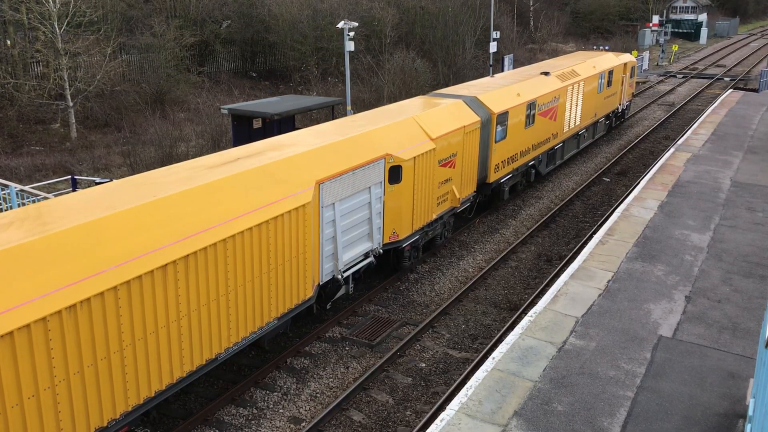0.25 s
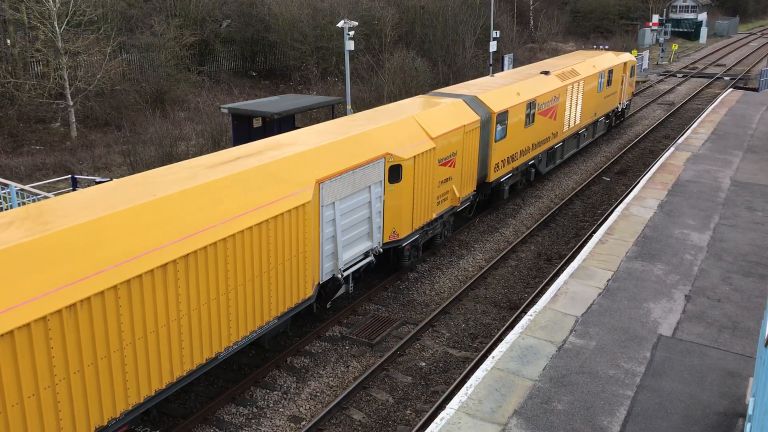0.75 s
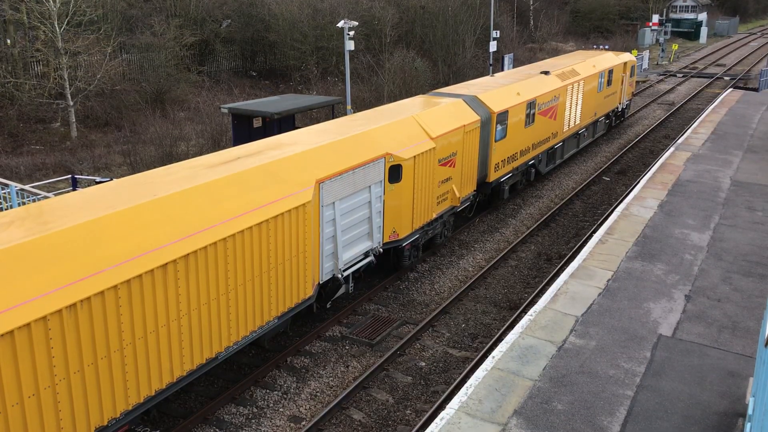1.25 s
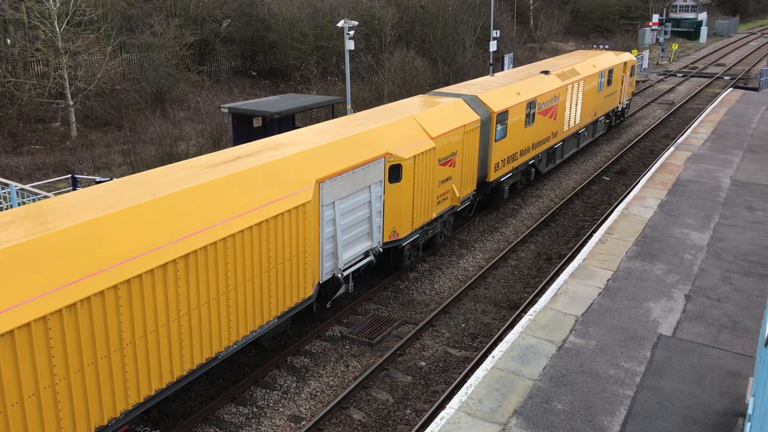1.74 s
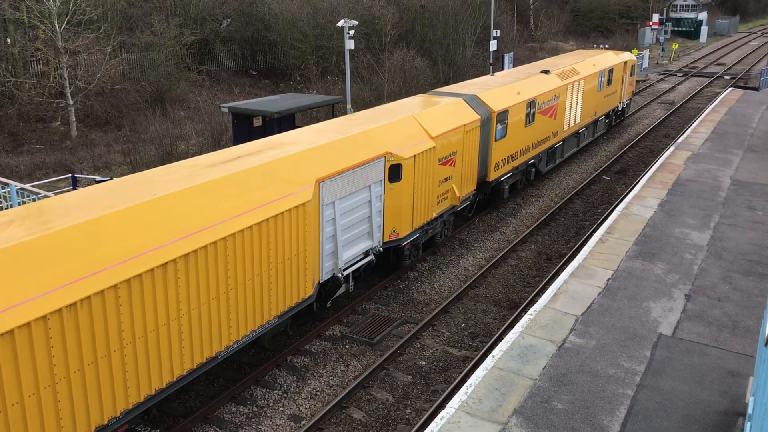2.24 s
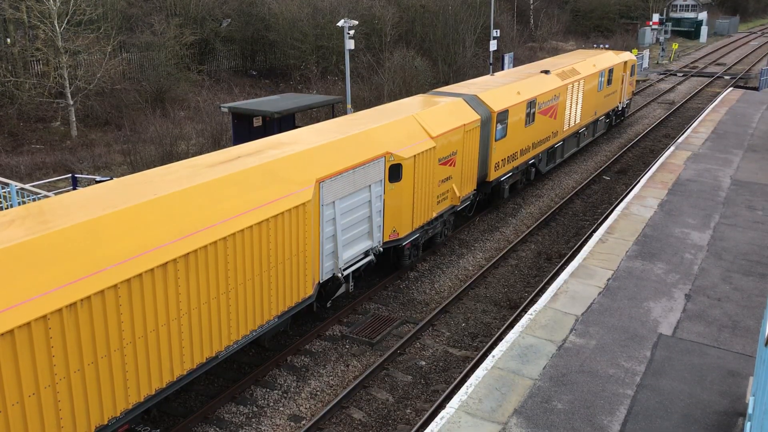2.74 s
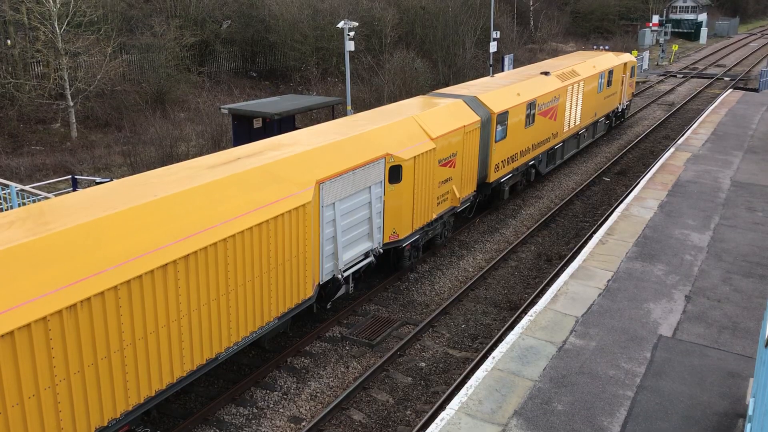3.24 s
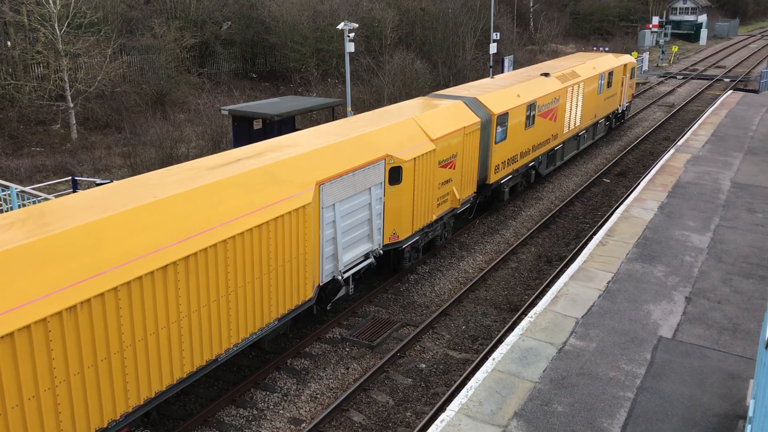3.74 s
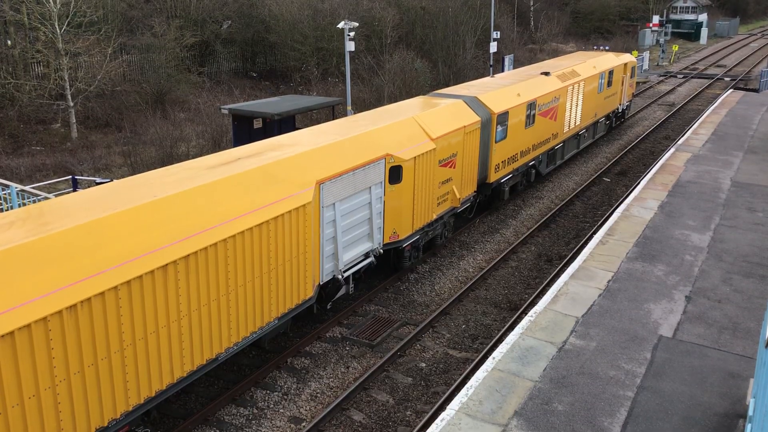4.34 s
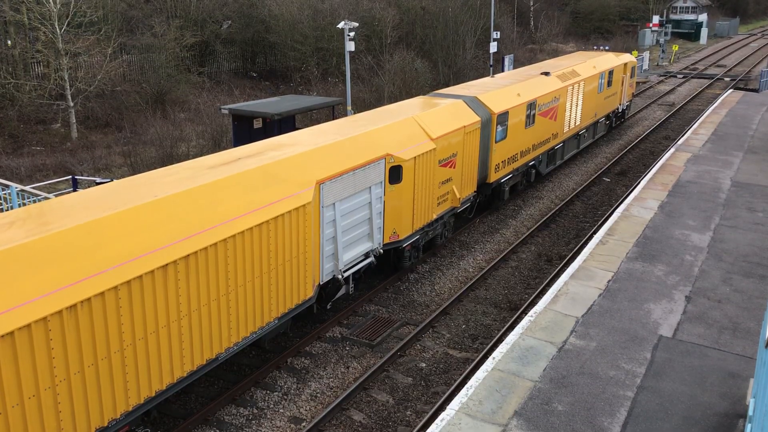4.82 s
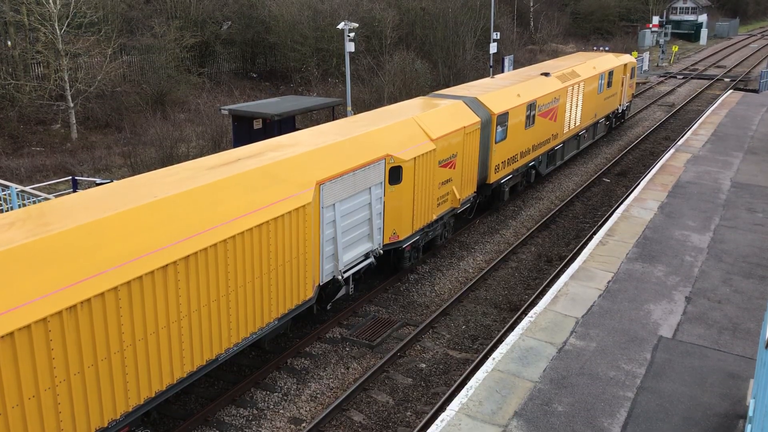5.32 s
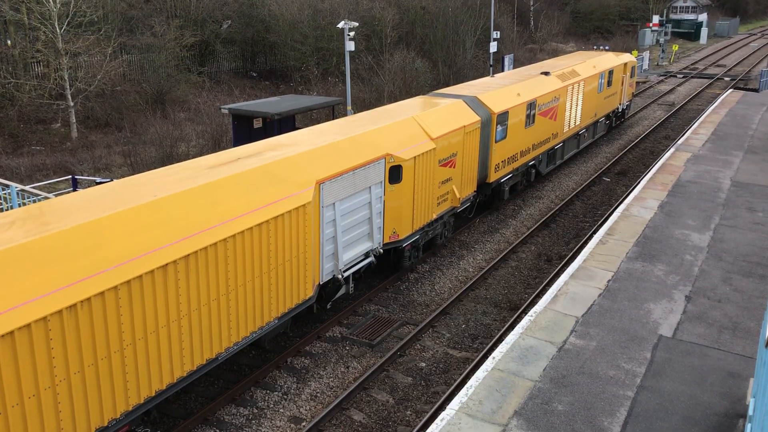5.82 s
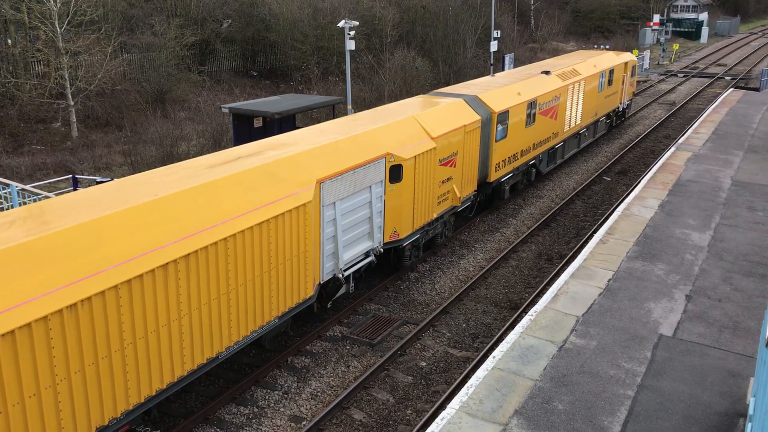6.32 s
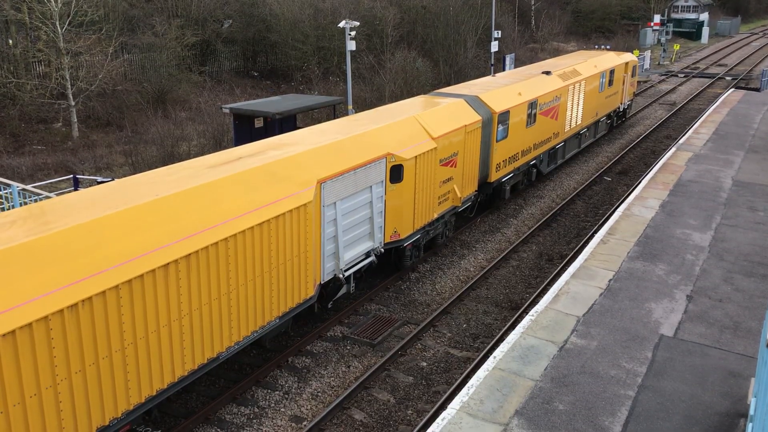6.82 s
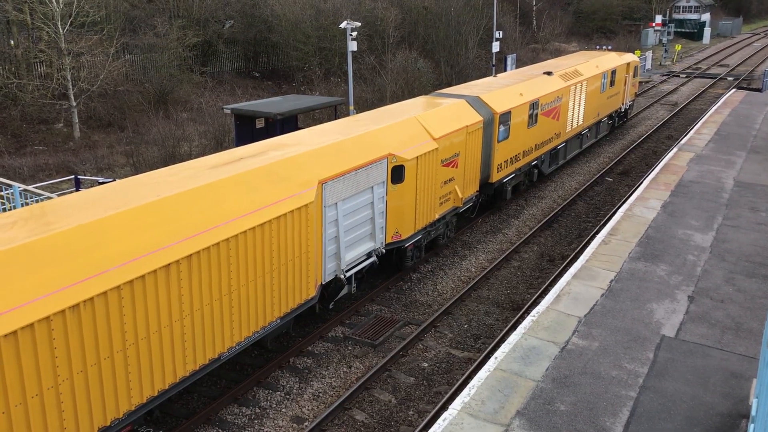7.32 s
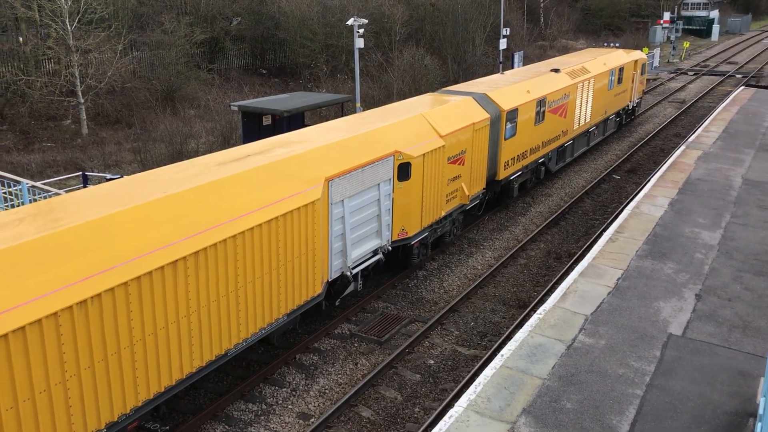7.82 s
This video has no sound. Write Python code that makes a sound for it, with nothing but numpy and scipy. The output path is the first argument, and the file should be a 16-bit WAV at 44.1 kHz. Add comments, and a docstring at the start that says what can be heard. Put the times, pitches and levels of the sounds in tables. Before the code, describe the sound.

A maintenance train creeps past outdoors, heard from a footbridge over a station platform. Its diesel engine drones low throughout, growing a little fuller over the first two seconds and easing slightly after about 6.5 seconds. Cooling fans add a steady, airy roar with a light hiss. Two mid-pitched gear whines slowly swell and fade, while a fainter, higher, raspy whine throbs about seven times a second. A very faint, thin whistle rises briefly near 2.7 seconds.

Wind brushes the microphone softly around 0.6 and 2 seconds. From about 3.3 to 5.7 seconds, stronger gusts bring low rumbling with irregular dull thuds and flaps. More buffeting comes between 6 and 6.8 seconds and again from 7.3 seconds, with the hardest flaps at about 7.7 and another thud near 8 seconds. The machinery keeps running underneath to the end.

```python
"""On a footbridge over a station platform, a rail maintenance train is heard creeping past.
Its diesel drones at harmonics of the engine cycle under the turbulent roar of cooling fans;
gears whine, and one whine throbs at half the engine's cycle rate.
Gusts hit the microphone in a freshening breeze: each rumbles and sheds eddies that thud and flap."""
import sys
import numpy as np
from scipy import signal
from scipy.fft import rfft, irfft, next_fast_len
from scipy.io import wavfile
from scipy.ndimage import map_coordinates

SR = 44100
rng = np.random.default_rng(int(sys.argv[2]) if len(sys.argv) > 2 else 0)


def persist_wave(psi):
    """Save psi, clipped to +-1, as 16-bit WAV."""
    counts = np.round(np.clip(psi, -1, 1) * 32767).astype(np.int16)
    wavfile.write(sys.argv[1], SR, np.atleast_2d(counts).T)


N = 355446
CYCLE_HZ = 14.26  # four-stroke cycles a second

# swell shared by the fans and the throbbing whine: (time [s], relative level [dB])
AIRFLOW = [(0, -46.5), (.35, -45.5), (.85, -47), (1.55, -46), (2.25, -48), (2.68, -45.5), (3.05, -46),
           (3.3, -48), (3.92, -46), (4.15, -47.5), (4.6, -50), (4.76, -46), (4.9, -48.5), (5.1, -47),
           (5.55, -50), (6.0, -47), (6.3, -49.5), (6.97, -47), (8.06, -47.5)]


def diesel(cycle, exhaust_db=-35.5, puff_depth=0.34, waver_db=2.0):
    """Periodic excitation: uneven cylinders give harmonics of the cycle; each firing puffs exhaust."""
    # engine harmonics, order 4 being the firing rate: (order [per cycle], base level [dB])
    orders = [(4, -25.5), (5, -37.5), (10, -51.5), (14, -56), (16, -55.5), (25, -54), (27, -57)]
    # swell of the firing note: (time [s], gain [dB])
    firing_swell = [(0, -6.5), (.5, -6.5), (1.3, -2), (2.2, -0.5), (3.2, -1), (4, -1.5), (5, -1),
                    (6.6, -0.5), (8.06, -4)]
    # third harmonic of the firing note: (time [s], level [dB])
    hum = [(0, -37), (1.1, -44), (2.2, -45.5), (8.06, -42.5)]
    # exhaust noise: (frequency [Hz], relative spectral level [dB])
    exhaust = [(20, -51), (35, -3), (70, -2), (110, -7.5), (170, -11), (260, -18), (450, -23), (900, -29),
               (2000, -99)]
    tones = amp(curve(hum)) * np.sqrt(2) * np.sin(12 * cycle)
    for order, db in orders:
        swell_db = curve(firing_swell) if round(order) == 4 else waver_db * wobble(6)
        phase = order * cycle + rng.uniform(0, 2 * np.pi)
        tones += amp(db + swell_db) * np.sqrt(2) * np.sin(phase)
    puffs = 1 + puff_depth * np.cos(4 * cycle)
    return tones + amp(exhaust_db) * unit(noise(exhaust) * puffs)


def fans(roar_db=-41.5, hiss_db=-57, flutter_db=0.57):
    """Turbulent cooling air makes broadband noise and excites resonances in ducts and casing."""
    # roar through the grilles: (frequency [Hz], relative spectral level [dB])
    roar_spectrum = [(100, 8), (300, -0.5), (560, 9.5), (900, 0), (1150, 0.5), (1680, 0.5), (2250, -0.5),
                     (3000, -3.5), (4100, -6.5), (5000, -12.5), (5500, -22.5), (7000, -40)]
    # fine hiss of the air: (frequency [Hz], relative spectral level [dB])
    hiss_spectrum = [(3500, -28), (5400, 4), (7200, 4), (7700, 1.5), (9500, 1), (10100, -2.5), (10450, -8),
                     (10800, -4), (11500, -5), (12600, -8.5), (13300, -12), (16600, -18)]
    # duct and casing modes: (frequency [Hz], width [Hz], base level [dB])
    casing_modes = [(319, 65, -50.5), (523.5, 26, -52.5), (654, 170, -52), (945, 39, -58.5),
                    (1462, 160, -56), (2430, 15, -63.5), (2623, 44, -62), (4030, 130, -68)]
    swell_db = airflow_swell() + flutter_db * wobble(11)
    roar = amp(roar_db) * noise(roar_spectrum)
    ringing = amp(wobble(6)) * resonances(casing_modes)
    hiss = amp(hiss_db + flutter_db * wobble(20)) * noise(hiss_spectrum)
    return amp(0.69 * swell_db) * (roar + ringing) + amp(0.9 * swell_db) * hiss  # the hiss swells more


def gears(lower_hz=682, lower_db=-49, upper_hz=755.4, beat_s=1.25, peak_s=0.98, beat_depth=0.54):
    """Meshing teeth radiate two tones: the lower beats slowly, the upper swells and fades."""
    # upper gear tone: (time [s], level [dB])
    upper_level = [(0, -49), (.75, -54.5), (1.55, -54), (2.42, -47), (2.78, -62), (3.2, -49.5), (4.0, -56),
                   (4.4, -47.5), (5.02, -55), (5.6, -49), (6.0, -53.5), (6.4, -46), (7.0, -47),
                   (7.4, -54.5), (8.06, -47.5)]
    t = np.arange(N) / SR
    beat = np.abs(1 + beat_depth * np.exp(2j * np.pi * (t - peak_s) / beat_s))
    lower = tone(lower_hz, lower_db + 0.5 * wobble(6.6), drift=0.00096, rate=22)
    upper = tone(upper_hz, curve(upper_level) + 0.5 * wobble(6.6), drift=0.00096, rate=22)
    return beat * lower + upper


def fan_and_pump_tones(waver_db=1.0):
    """Steady rotation gives a line spectrum; each line wavers in pitch and level."""
    # fan and pump lines: (frequency [Hz], mean level [dB])
    lines = [(51.4, -40), (149.6, -52), (201, -53), (339.1, -53), (587, -62), (1512, -59), (1980, -63.5),
             (2211, -68), (2313, -63)]
    return sum(tone(hz, db + waver_db * wobble(2.87), drift=0.00101, rate=25) for hz, db in lines)


def throb(cycle, rasp_depth_db=4, recede_db_per_s=0.1):
    """Amplitude modulation: a rasping whine swells once in two engine cycles and slowly recedes."""
    # throbbing tones: (frequency [Hz], base level [dB], modulation depth [dB], first swell [s])
    partials = [(1792, -59.5, 5.5, 0.067), (1854, -58.5, 6.5, 0.1)]
    # noise band around the whine: (frequency [Hz], width [Hz], base level [dB])
    rasp_band = [(1887, 69, -57)]
    swell = lambda first_s: np.cos((cycle - 2 * np.pi * CYCLE_HZ * first_s) / 2)
    tones = sum(tone(hz, db + depth_db * swell(first_s), drift=0.00444, rate=40)
                for hz, db, depth_db, first_s in partials)
    strength = amp(airflow_swell() + wobble(7) - recede_db_per_s * np.arange(N) / SR)
    upper_swell = swell(partials[-1][-1])
    rasp = amp(rasp_depth_db * upper_swell) * resonances(rasp_band)
    return strength * (tones + rasp)


def whistle(hz=7576):
    """A flow tone: air whistles thinly, swells once and dies away as the train moves on."""
    # air whistle: (time [s], level [dB])
    level = [(0, -72), (2.3, -74), (2.68, -67), (3.3, -75), (8.06, -81)]
    return tone(hz, curve(level), drift=0.00137, rate=60)


def gust_level(breeze_db=-49.5, rise_db_per_s=1.85):
    """Incoherent powers add: bell-shaped gusts on a freshening breeze give the wind level in dB."""
    # gusts: (peak time [s], standard deviation [s], level [dB])
    gusts = [(0.597, 0.054, -34.5), (2.123, 0.093, -34.5), (3.542, 0.094, -27.5), (3.827, 0.084, -28.5),
             (4.133, 0.098, -31.5), (4.395, 0.071, -24.5), (4.94, 0.03, -28), (5.366, 0.11, -25.5),
             (6.053, 0.029, -26), (6.296, 0.051, -28.5), (7.437, 0.063, -34)]
    t = np.arange(N) / SR
    power = amp(breeze_db + rise_db_per_s * t) ** 2
    for peak_s, width_s, db in gusts:
        power += amp(db) ** 2 * np.exp(-((t - peak_s) / width_s) ** 2 / 2)
    return 10 * np.log10(power)


def thuds(eddies, core_db=-8, core_hz=160, wake_db=-4, wake_hz=80, wake_lag_s=0.0065):
    """Convected pressure: each eddy thuds with its core and heaves with its slower wake."""
    half = SR // 20
    t = np.arange(-half, half) / SR
    out = np.zeros(N + 2 * half)
    for s, thud_db, flap_db in eddies:
        spin, wake_detune, core_detune = rng.uniform(-0.4, 0.4, 3)
        angle = np.sign(spin) * np.pi / 2
        octaves = (flap_db - thud_db + 14) / 35 + core_detune / 2  # a harder flap raises the pitch
        core = swing(t, core_hz * 2 ** octaves, cycles=0.76, angle=angle, sweep=1.545)
        wake = swing(t - wake_lag_s, wake_hz * 2 ** (wake_detune / 2),
                     cycles=0.82, angle=angle + np.pi / 2, sweep=1.387)
        out[round(s * SR):][:len(t)] += amp(thud_db) * (amp(core_db) * core + amp(wake_db) * wake)
    return out[half:half + N]


def flaps(eddies, front_db=30, flurry_db=-9, flurry_s=0.0073, soft_db=-25, hard_db=-16):
    """Shorter pulses are brighter: an eddy breaks as a front in a dull flurry, steeper when hard."""
    # colour of a flap: (frequency [Hz], gain [dB])
    flap_response = [(180, 9), (330, 8), (500, 4.5), (800, 1), (1200, 0), (1500, -4.5), (1750, -27)]
    half = SR // 20
    t = np.arange(-half, half) / SR
    out = np.zeros(N + 2 * half)
    bell = lambda width_s: np.exp(-(t / width_s) ** 2 / 2)
    for s, _, db in eddies:
        edge = bell(np.interp(db, [soft_db, hard_db], [0.00045, 0.00014]))
        smoothing = bell(np.interp(db, [soft_db, hard_db], [0.0007, 0.00022]))
        swirl = signal.fftconvolve(rng.standard_normal(len(t)), smoothing, "same")
        ragged_db = 0.11 * max(db - hard_db, 0)
        flurry = amp(flurry_db + ragged_db) * unit(swirl) * bell(flurry_s)
        front = amp(front_db) * rng.choice([-1, 1]) * edge / edge.sum()
        out[round(s * SR):][:len(t)] += amp(db) * (front + flurry)
    return coloured(out[half:half + N], flap_response)


def wind(level, rumble_db=6, turbulence_db=0.5, lump_db=5, calm_db=-33):
    """Intermittent flow rumbles on the microphone in lumps; fine turbulence fades in light air."""
    # wind rumble: (frequency [Hz], relative spectral level [dB])
    rumble_spectrum = [(15, -36), (25, -23), (36, 2), (48, 6.5), (65, 6.5), (100, -15), (200, -65)]
    # fine turbulence: (frequency [Hz], relative spectral level [dB])
    turbulence_spectrum = [(30, -43), (60, 1.5), (90, 3), (145, 3), (220, -9.5), (320, -12.5), (500, -24.5),
                           (900, -40), (1700, -75)]
    strength = amp(level) / np.sqrt(1 + amp(calm_db - level) ** 2)
    lumps = unit(amp(lump_db * np.tanh(2 * wobble(24))))
    rumble = amp(level + rumble_db) * noise(rumble_spectrum)
    turbulence = amp(turbulence_db) * strength * noise(turbulence_spectrum)
    return lumps * (rumble + turbulence)


def small_eddies(level, per_s=14, thud_db=-15, flap_db=-35, at_wind_db=-25):
    """Irregular eddy shedding, harder in stronger wind: rows like those of the large eddies."""
    times = (np.arange(1, 401) + rng.uniform(-0.5, 0.5, 400)) / per_s
    times = times[times < N / SR]
    push_db = 0.73 * (np.interp(times * SR, np.arange(N), level) - at_wind_db)
    return np.transpose([times, thud_db + push_db, flap_db + push_db])


def swing(t, hz, cycles, angle, sweep):
    """The pressure of a passing eddy: one swing without ringing, fastest as its core goes by."""
    u = t * hz / cycles
    phase = 2 * np.pi * sweep * cycles * np.arcsinh(u) + angle
    return np.cos(phase) / (1 + u * u) * np.hanning(len(t))


def airflow_swell():
    """Slow modulation: the airflow's level about its mean, in dB."""
    level = curve(AIRFLOW)
    return level - level.mean()


def tone(hz, db, drift, rate):
    """Frequency modulation: a machine tone of rms level db whose pitch wanders."""
    return amp(db) * np.sqrt(2) * np.sin(turns(hz, drift, rate))


def turns(hz, drift, rate):
    """Phase is the integral of frequency, which here wanders by the fraction drift."""
    return 2 * np.pi * np.cumsum(hz * (1 + drift * wobble(rate))) / SR


def resonances(modes):
    """Random excitation of modes given as (frequency [Hz], width [Hz], level [dB])."""
    def response(f):
        return sum(amp(db) * unit(1 / (1 + ((f - hz) / width) ** 2) ** 2) for hz, width, db in modes)
    return filtered(rng.standard_normal(N), response)


def noise(spectrum):
    """Coloured Gaussian noise of rms 1."""
    return unit(coloured(rng.standard_normal(N), spectrum))


def coloured(x, spectrum):
    """Spectral shaping by (frequency [Hz], gain [dB]) points, with nothing above the last."""
    f, db = np.transpose(spectrum)
    return filtered(x, lambda hz: amp(np.interp(np.log(hz + 1), np.log(f), db)) * (hz < f[-1]))


def filtered(x, response):
    """Linear filtering: the spectrum of x times a frequency response."""
    size = next_fast_len(N + SR // 2)
    return irfft(rfft(x, size) * response(np.fft.rfftfreq(size, 1 / SR)), size)[:N]


def wobble(rate):
    """A smooth random curve, rate knots a second."""
    knots = rng.standard_normal(2048)
    grid = np.arange(0, N, 64)
    coarse = map_coordinates(knots, [grid * rate / SR], mode="wrap")
    return np.interp(np.arange(N), grid, coarse)


def curve(rows):
    """Linear interpolation of (time [s], level [dB]) points at every sample."""
    times, levels = np.transpose(rows)
    return np.interp(np.arange(N) / SR, times, levels)


def amp(db):
    """Decibels to gain."""
    return 10 ** (np.asarray(db) / 20)


def unit(x):
    """Scale to rms 1."""
    return x / np.sqrt(np.mean(x ** 2) + 1e-20)


def scene():
    """Superposition of the train's machinery and the wind at the microphone."""
    # large eddies striking the microphone: (time [s], thud gain [dB], flap gain [dB])
    large_eddies = [(1.378, -15, -40), (1.895, -12, -38), (2.343, -17.5, -59), (2.92, -17, -43),
                    (3.26, -13.5, -33), (3.37, -11.5, -38), (3.483, -13, -29), (3.538, -15, -28),
                    (3.641, -14, -28), (3.752, -12, -28), (3.782, -11, -25.5), (3.828, -19, -26),
                    (3.848, -11.5, -57), (3.86, -11.5, -24.5), (4.12, -11, -29.5), (4.138, -12.5, -23.5),
                    (4.244, -16.5, -25), (4.332, -12, -30), (4.347, -10, -40), (4.392, -8, -21),
                    (4.514, -9, -16.5), (4.556, -18, -28), (4.605, -13.5, -38), (4.901, -25, -20.5),
                    (5.131, -15, -28), (5.161, -16, -27), (5.184, -3, -22.5), (5.276, -14.5, -24),
                    (5.314, -14, -27), (5.348, -11, -22), (5.367, -11, -18.5), (5.405, -18, -21),
                    (5.42, -13, -21), (5.438, -6.5, -65), (5.51, -18, -26), (5.663, -17, -27),
                    (5.687, -9, -22), (6.048, -12.5, -28), (6.087, -18, -30), (6.256, -9, -40),
                    (6.302, -18, -19.5), (6.315, -12, -49), (6.342, -13, -16.5), (6.377, -14, -23),
                    (6.388, -14, -21), (6.482, -19, -26), (6.492, -18, -20), (6.498, -18, -17.5),
                    (6.504, -15, -20), (6.511, -9.5, -24), (6.529, -13, -20.5), (6.586, -19, -28),
                    (6.661, -15, -18), (6.77, -11.5, -21.5), (6.819, -15, -21), (7.276, -8, -25.5),
                    (7.398, -13, -24), (7.414, -11, -35), (7.464, -15, -24), (7.497, -21.5, -23),
                    (7.667, -8, -22), (7.684, -7, -19.5), (7.712, -14, -27), (7.733, -9, -20),
                    (7.741, -8, -11), (7.752, -5.5, -9), (7.973, -3.5, -16.5)]
    cycle = turns(CYCLE_HZ, drift=0.001, rate=2.89)
    train = diesel(cycle) + gears() + whistle() + fan_and_pump_tones() + throb(cycle) + fans()
    wind_db = gust_level()
    eddies = np.vstack([large_eddies, small_eddies(wind_db)])
    return (train + wind(wind_db) + thuds(eddies) + flaps(eddies))[None]


def record(dry, low_cut_hz=27, saturate_below_hz=1600, ceiling=0.75, top_hz=15720):
    """Band limiting and soft saturation: the microphone sheds deep rumble and rounds hard gusts."""
    low_pass = lambda hz: 1 / (1 + (hz / saturate_below_hz) ** 16)
    sound = filtered(dry[0], lambda hz: hz ** 4 / (hz ** 4 + low_cut_hz ** 4))
    low = filtered(sound, low_pass)
    saturated = low / (1 + np.abs(low / ceiling) ** 6) ** (1 / 6)
    sound += filtered(saturated - low, low_pass)
    return filtered(sound, lambda hz: hz < top_hz)[None]


dry = scene()
out = record(dry)
persist_wave(out)
```